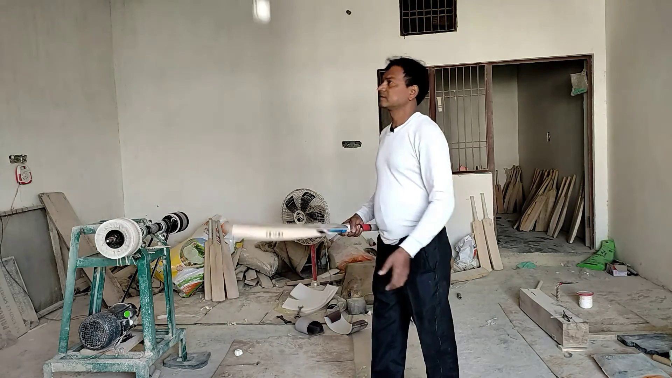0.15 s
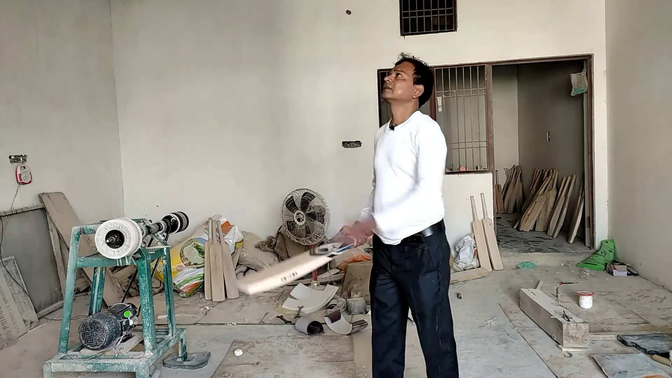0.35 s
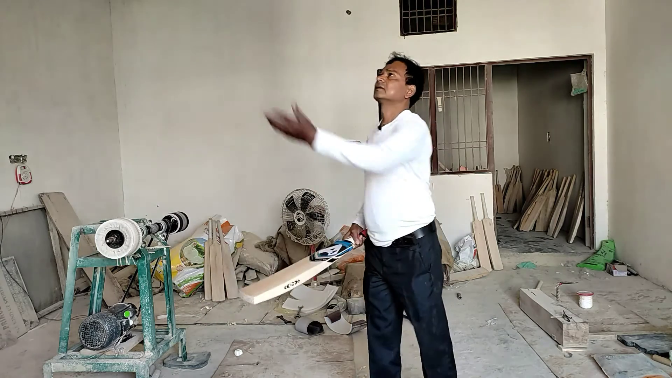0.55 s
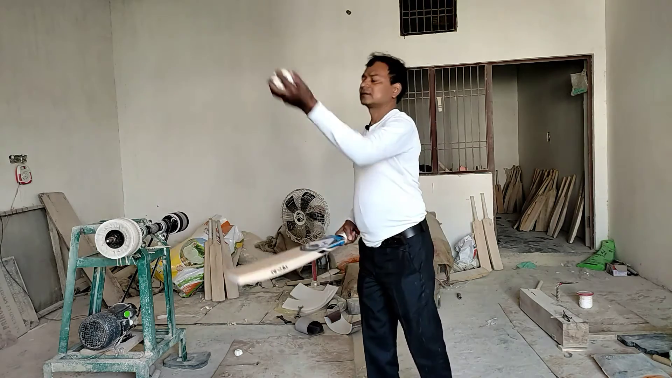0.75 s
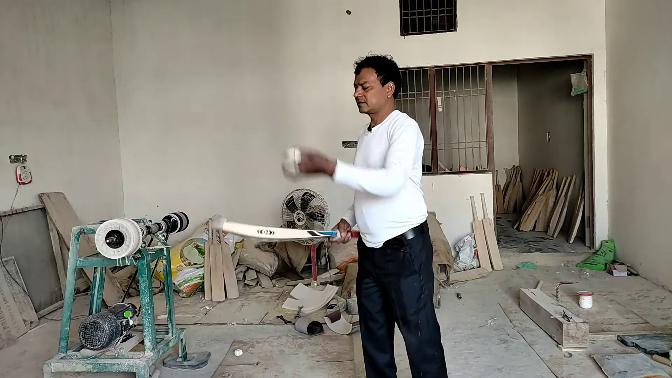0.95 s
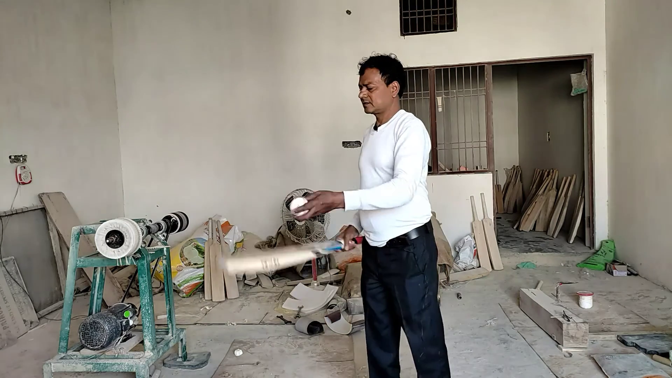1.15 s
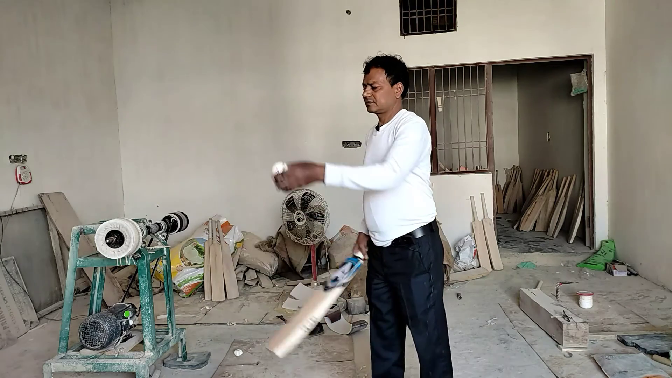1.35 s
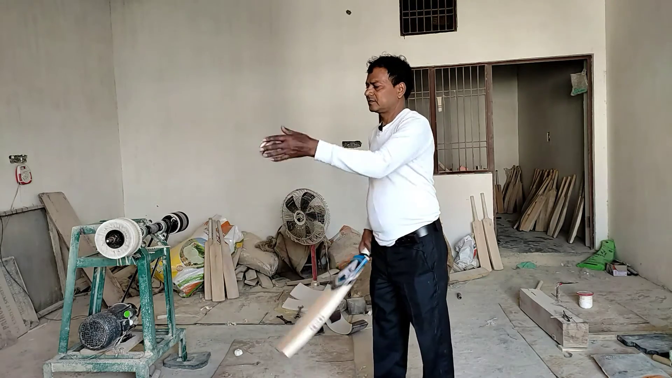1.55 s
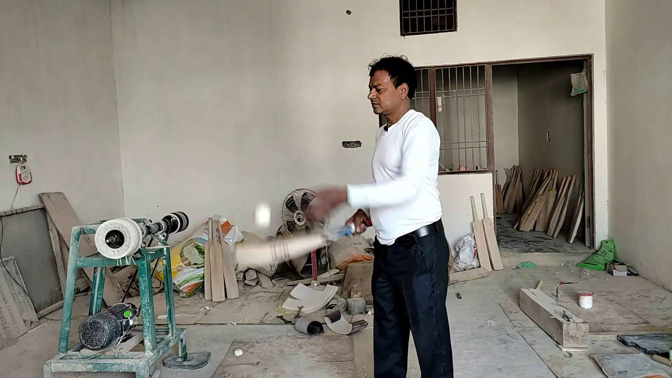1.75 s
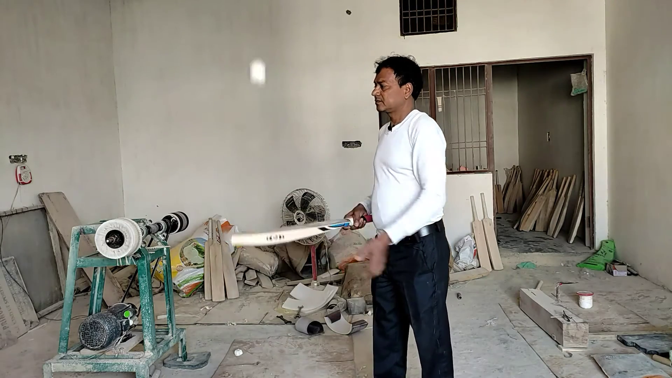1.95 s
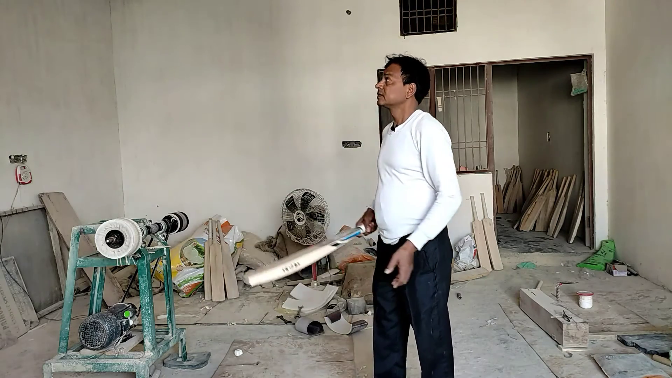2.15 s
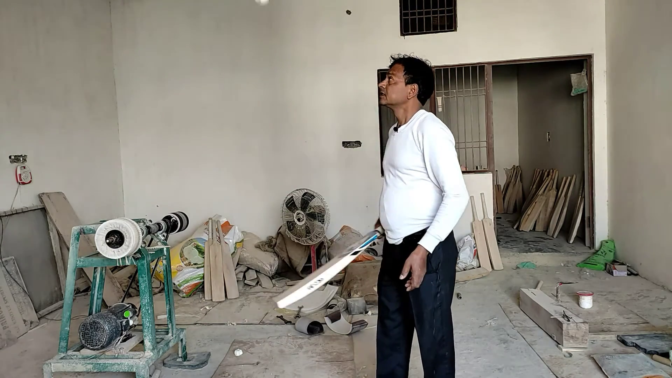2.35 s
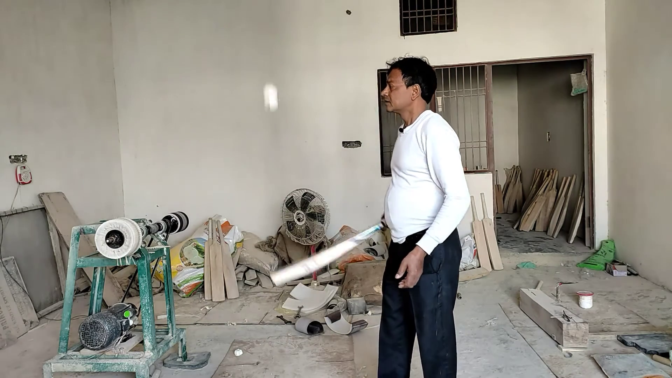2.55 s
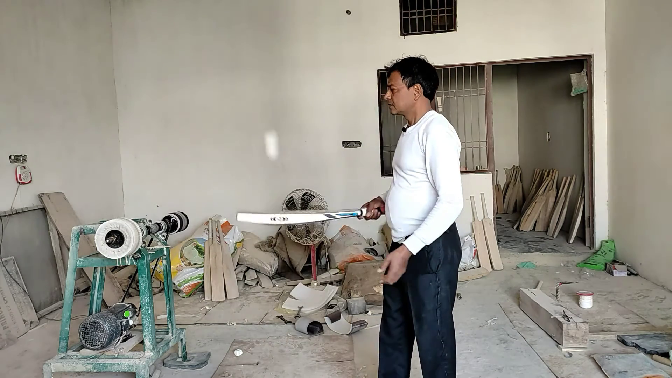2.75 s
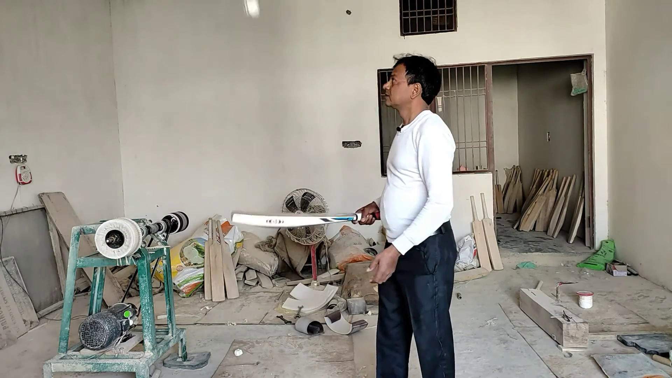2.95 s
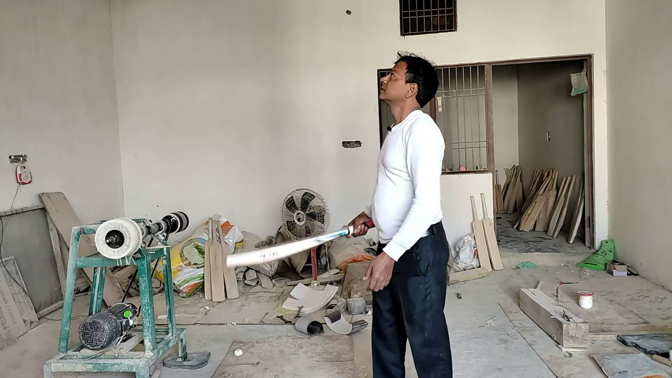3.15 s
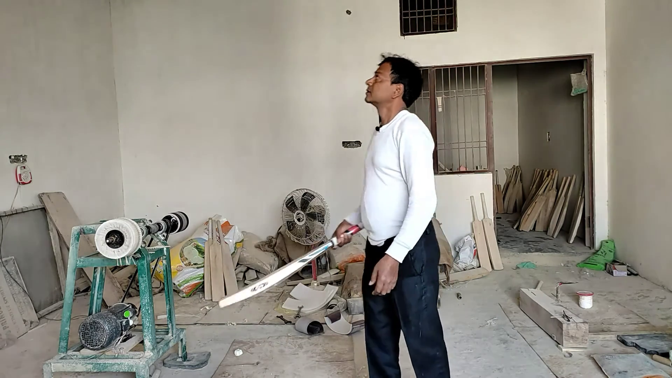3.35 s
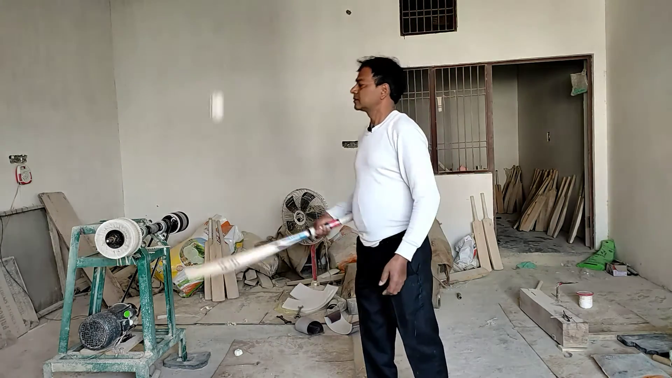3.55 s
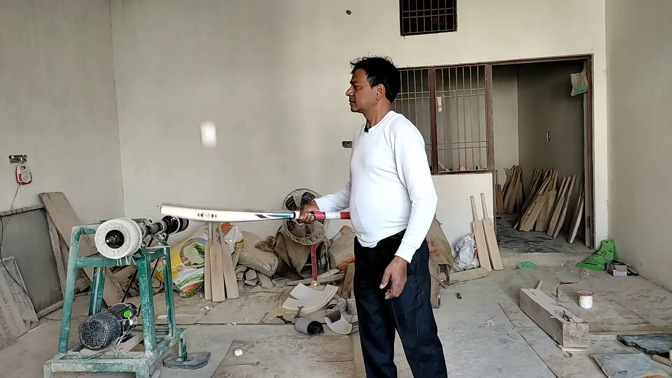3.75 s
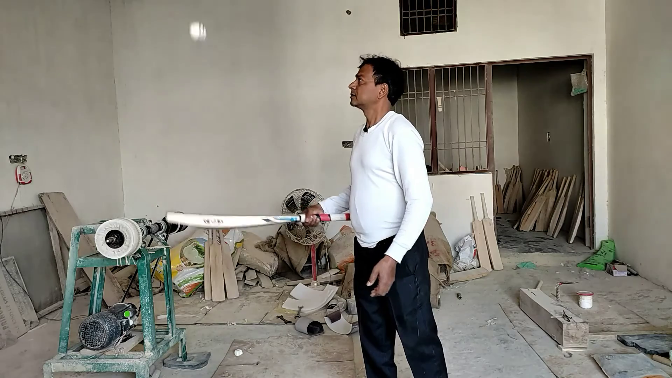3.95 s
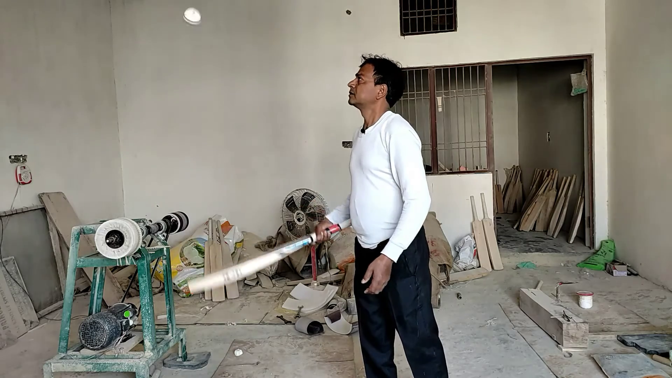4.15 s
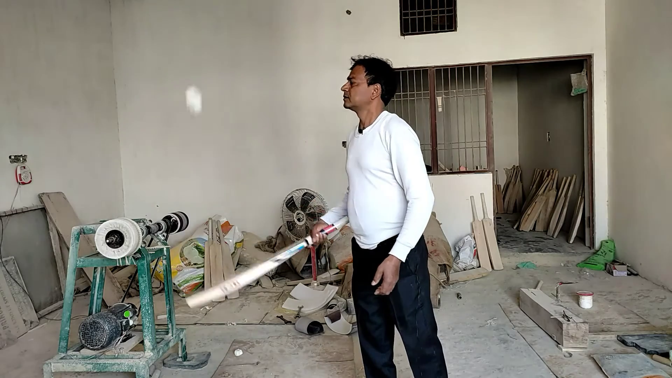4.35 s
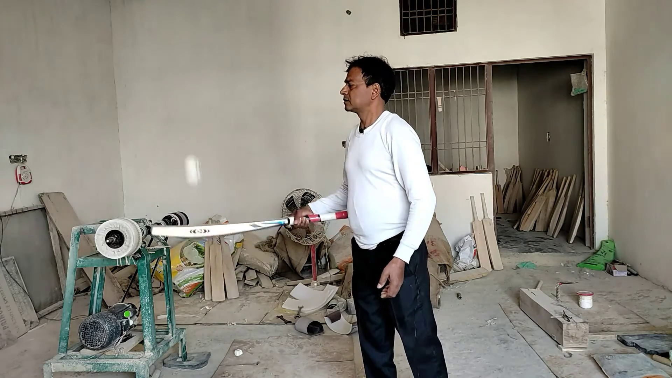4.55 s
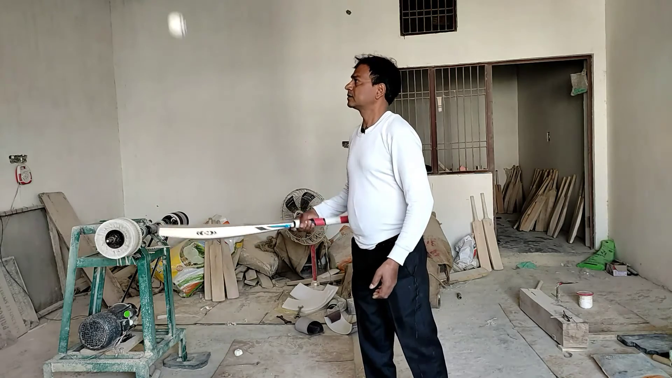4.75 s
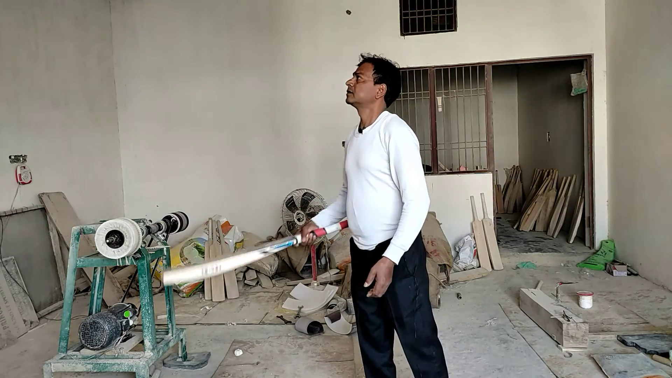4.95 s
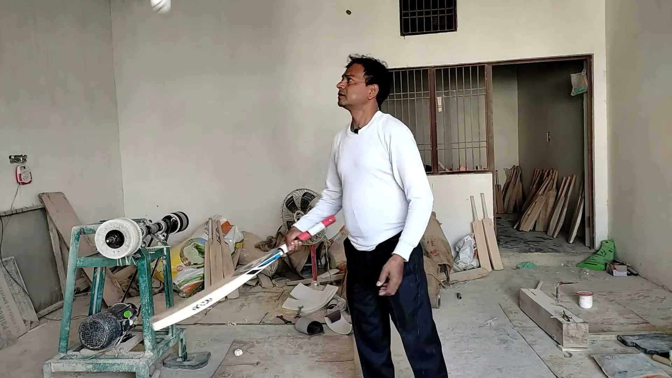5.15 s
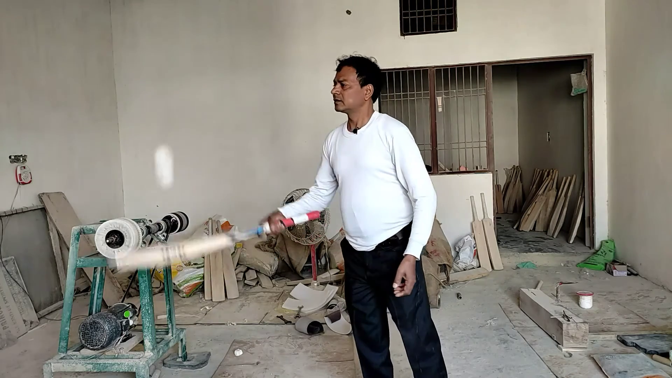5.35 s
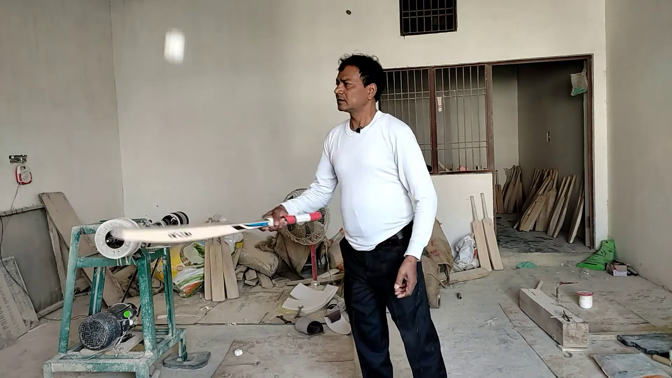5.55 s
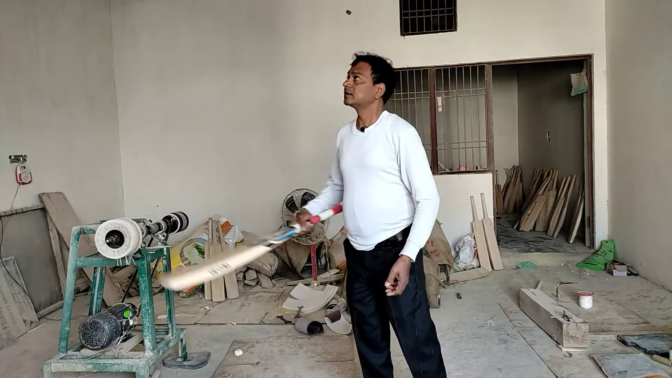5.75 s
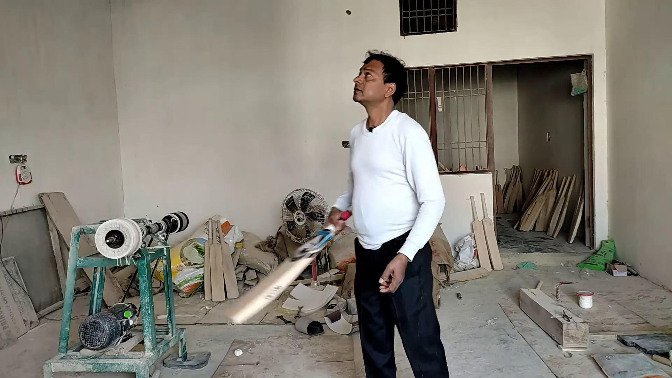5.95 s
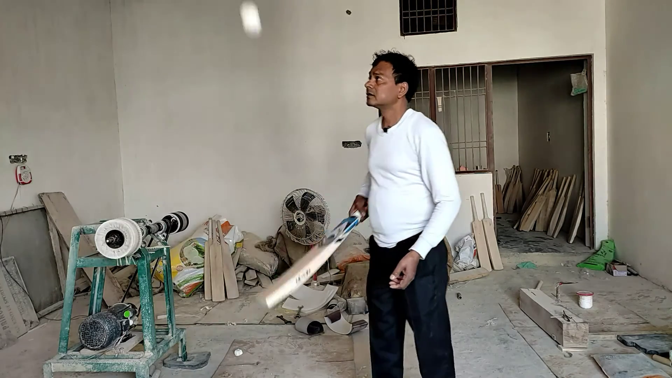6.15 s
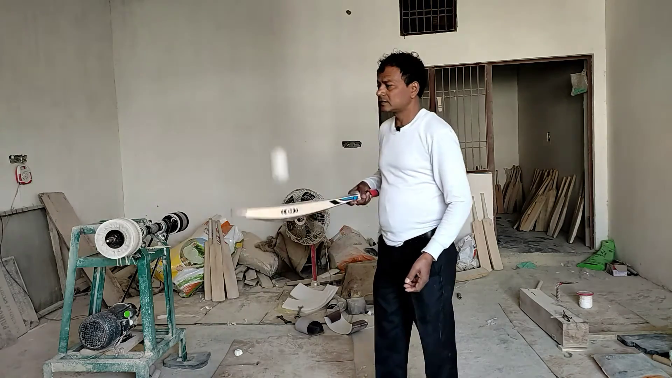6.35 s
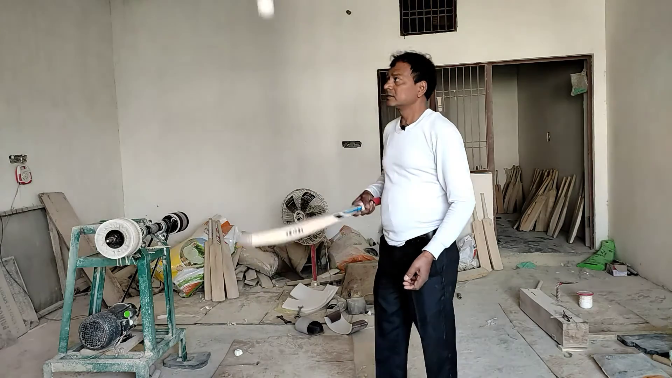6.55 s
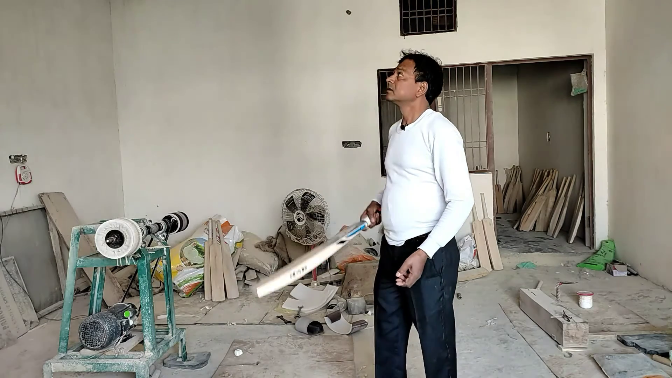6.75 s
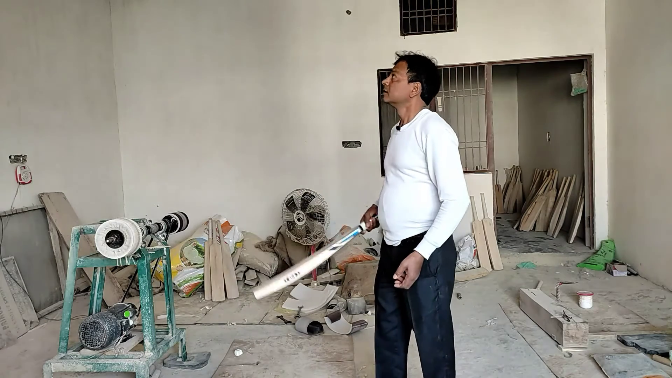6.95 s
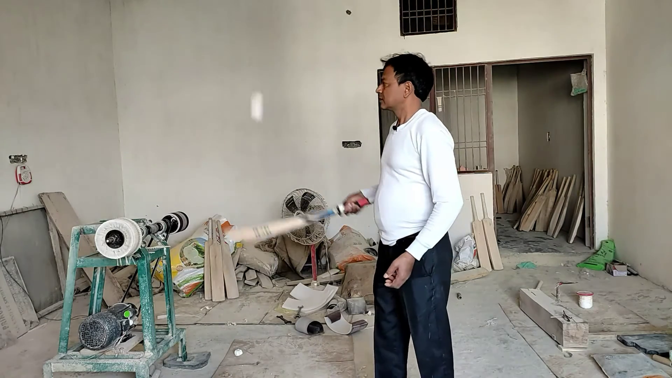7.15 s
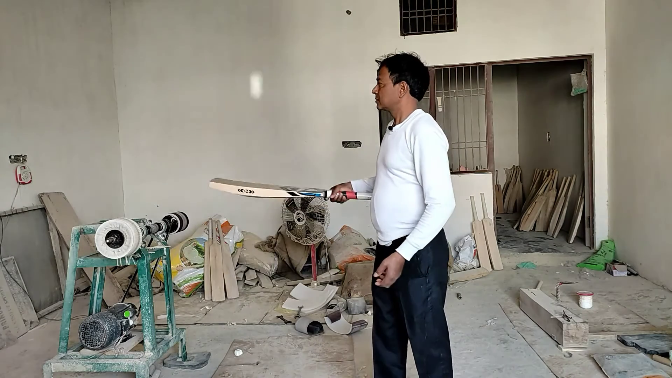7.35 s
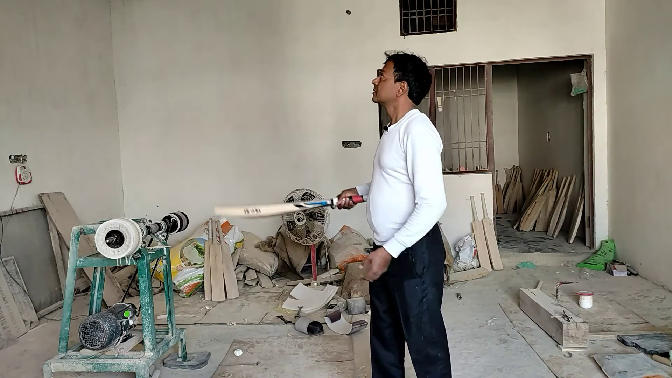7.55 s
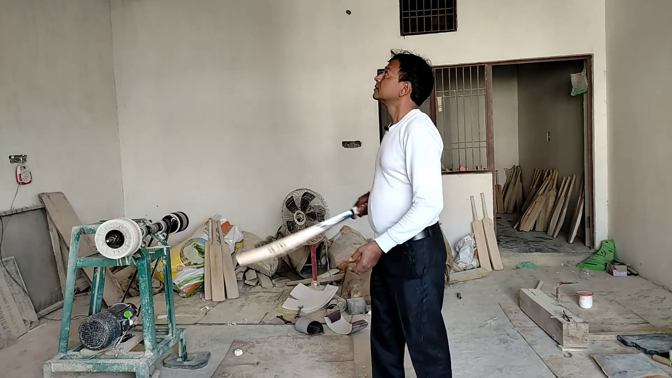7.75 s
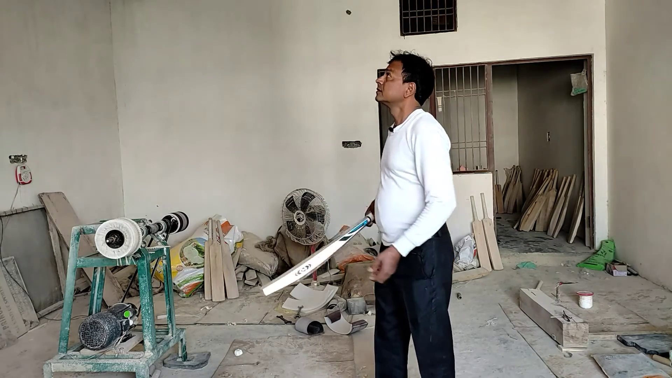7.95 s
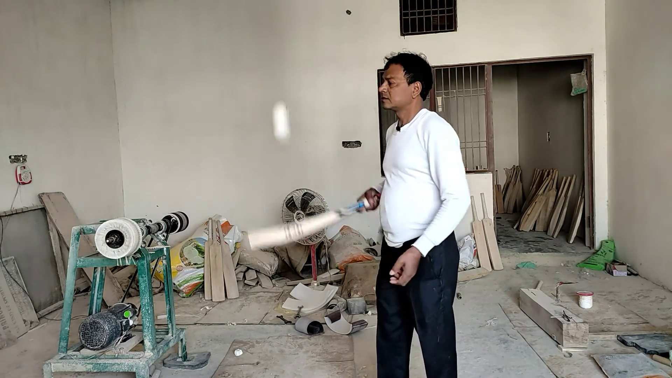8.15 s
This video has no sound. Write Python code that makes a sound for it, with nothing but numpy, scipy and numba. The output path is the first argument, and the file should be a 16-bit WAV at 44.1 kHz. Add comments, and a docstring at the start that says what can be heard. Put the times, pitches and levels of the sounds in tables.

```python
"""A bare masonry workshop, where a hard ball is tapped up eight times on the face of a wooden bat.
Each millisecond of contact rings the bat's damped modes, and the room answers for about a second.
A limiter ducks on every knock and lets go about a tenth of a second later, so the room blooms like a second beat.
Between knocks: decaying noise for handling ticks, smooth swells of noise for sleeve rustles, low noise
for air on the microphone, and a thin hiss of narrow bands over room tone and a faint drone."""
import sys
import numpy as np
from scipy import signal
from scipy.fft import rfft, irfft
from scipy.io import wavfile
from numba import njit

SR = 44100
rng = np.random.default_rng(int(sys.argv[2]) if len(sys.argv) > 2 else 0)


def int16_out(signal):
    """Quantize to a 16-bit WAV file."""
    q = np.round(np.clip(np.atleast_2d(signal).T, -1, 1) * 32767)
    wavfile.write(sys.argv[1], SR, q.astype(np.int16))


N = 365148
T = np.arange(N) / SR

# All levels in the tables are relative within their source, save where a function uses them alone.
# knocks: (time [s], level [dB], crack [dB], bending mode [dB], ping [dB], scuff [dB], room [dB],
#          limiter hold after the peak [s])
KNOCKS = [(0.0675, -1, -1.5, -0.5, -6, 1, -4, 0.089), (1.9457, -3, 0.5, -1.5, 5.5, 1, -2, 0.086),
          (2.854, 2.5, 0.5, -6.5, 3.5, 3.5, -3, 0.086), (3.8274, -0.5, -0.5, -1, 0, 6, -2, .098),
          (4.6690, -1.5, 2, -2, 5, -4, -2, 0.094), (5.5623, -2, -3, 0, -14, -3, -1, 0.0844),
          (6.4911, 3.5, -5, -1.5, -4, 7, -5, 0.081), (7.4053, 1, 2.5, 3.5, 9, 9, -4, 0.088)]
# the bat's modes, of which the first bends the blade and depends on where the ball lands:
# (frequency [Hz], decay by 60 dB [s], level [dB], sign [+1 or -1])
BAT_MODES = [(655, .041, -29, -1), (954, .0048, -3, -1), (1316, .007, 0, 1)]
# a higher mode, woken only by the hard first touch: (frequency [Hz], decay by 60 dB [s], level [dB])
PING_MODE = (2624, 0.051, -62)
# spectrum of the crack as hard surfaces meet: (frequency [Hz], level [dB])
CRACK_SPECTRUM = [(200, -33), (1200, -11.5), (2000, -13), (3200, -22), (4300, -26), (6500, -33.5),
                  (10000, -34.5), (15500, -49)]
# first echoes from floor and walls: (mean delay [s], wood level [dB], crack level [dB])
FIRST_ECHOES = [(.0047, -17.5, -14.5), (0.0112, -19.5, -40), (0.0177, -32, -18)]
# diffuse sound of the room: (frequency [Hz], level [dB], decay by 60 dB [s])
DIFFUSE_ROOM = [(49, -33, 1.8), (120, 2.5, 1.38), (218, 1, 1.09), (302, 7, 1.115), (566, -0.5, 0.98),
                (626, -1.5, 0.89), (1135, -6.5, 0.77), (1630, 0, 0.75), (1790, -5.5, 0.76), (2750, 1, 0.64),
                (4750, -0.5, 0.56), (9030, 2, 0.4), (15000, 3, 0.22)]
# standing waves between the walls: (frequency [Hz], decay by 60 dB [s], level [dB])
STANDING_WAVES = [(107, 2.35, -1.5), (122.4, 1.32, -2), (169, 0.89, -13), (216.7, 1.67, -2.5),
                  (270.8, 1.14, 7), (311, 0.33, -2), (351, 3.2, -18), (474, 1.07, 3)]
# handling ticks: (time [s], level [dB], decay by 60 dB [s], strongest frequency [Hz])
TICKS = [(0.883, -36.5, 0.013, 6200), (1.119, -48, 0.032, 9500), (2.1974, -51, 0.01, 5500),
         (3.1945, -55, 0.0115, 5500), (7.341, -41, 0.0091, 3600)]
# sleeve rustles: (time of the middle [s], level [dB], length [s], strongest frequency [Hz])
RUSTLES = [(0.537, -69, 0.099, 9000), (1.059, -53, 0.098, 1090), (1.093, -65, 0.092, 10000),
           (1.141, -54, .16, 710), (6.199, -47, 0.08, 745)]
# spectrum of air on the microphone: (frequency [Hz], level [dB])
AIR_SPECTRUM = [(4, -7.5), (13, 0.0), (25, -15.5), (50, -31), (110, -38.5), (400, -82)]
# spectrum of the quiet workshop: (frequency [Hz], level per Hz [dB])
QUIET_SPECTRUM = [(40, -5), (70, -3), (105, -11.5), (140, -12), (300, -16.5), (550, -20.5), (1200, -17.5),
                  (2000, -25.5), (3500, -28.5), (5500, -30.5), (7500, -41.5), (8400, -41.5), (12000, -42),
                  (15500, -46)]
# faint drone under the room tone: (frequency [Hz], level [dB])
DRONE = [(527.6, -70.5), (818.3, -74), (1066, -84), (1227, -72), (1491, -72.5)]
# narrow bands in the hiss: (frequency [Hz], width [Hz], mean level per Hz [dB])
HISS_BANDS = [(4546, 200, -1.5), (5540, 170, -4), (6080, 70, -1.5), (6460, 45, -1), (7170, 96, -1.5),
              (7680, 93, -4.5), (8720, 110, -11)]

CONTACT_S = 0.0011  # the ball stays on the wood equally long at every knock
RUSTLE_SKIRT_DB = -19  # for every two octaves away from a rustle's strongest frequency
# air: a steady draught that wanders by chance and swells once
AIR_DB, AIR_WANDER_DB = -47, 0.5
GUST_S, GUST_WIDTH_S, GUST_DB = 1.25, 0.51, 8
TONE_DB = -53.5
# hiss: each band wavers by chance, and the whole has one slow swell and one brief dip
HISS_DB, HISS_WAVER_DB = -64.5, 3.5
HISS_SWELL_S, HISS_SWELL_WIDTH_S, HISS_SWELL_DB = 4.2, 0.6, 3
HISS_DIP_S, HISS_DIP_WIDTH_S, HISS_DIP_DB = 5.7, 0.13, -7
TOP_HZ = 15450  # upper edge of the recorded band


def bouncing():
    """Superposition: every knock arrives directly, by the first echoes and through the room."""
    out = np.zeros(N)
    for s, db, *touch, room_db, _ in KNOCKS:
        wood, crack = undb(db + 33.0) * np.array(knock(CONTACT_S, *touch))
        add(out, s, wood + crack)
        for mean_delay, wood_db, crack_db in FIRST_ECHOES:
            # the bat is never twice in the same place, so the paths differ a little
            delay = mean_delay * (1 + 0.034 * rng.standard_normal())
            add(out, s + delay, undb(wood_db) * wood + undb(crack_db) * crack)
        reverberation = signal.fftconvolve(wood + crack, room_response())
        add(out, s, undb(room_db) * reverberation)
    return out


def knock(contact_s, crack_db, bend_db, ping_db, scuff_db):
    """Elastic contact: a push of finite length excites damped modes; the surfaces crack, ping and scuff."""
    t = T[:4096]
    # elastic force grows as the 3/2 power of the squeeze; a longer contact is duller
    squeeze = np.abs(np.sin(np.pi * np.minimum(t / contact_s, 1)))
    push = squeeze ** (3 / 2)
    ring = np.zeros(len(t))
    for (hz, t60, db, sign), spot_db in zip(BAT_MODES, [bend_db, 0, 0]):
        ring += sign * undb(db + spot_db) * fade(t, t60) * np.cos(2 * np.pi * hz * t)
    wood = signal.fftconvolve(push / push.sum(), ring)[:len(t)]

    click = signal.unit_impulse(len(t), np.argmax(push))  # at the hardest squeeze
    crack = undb(crack_db) * colour(click, CRACK_SPECTRUM) * fade(t, 0.047)
    hz, t60, db = PING_MODE
    ping = undb(db + ping_db) * fade(t, t60) * np.sin(2 * np.pi * hz * t)
    scuff = undb(scuff_db - 63) * fade(t, 0.024) * band(len(t), 8660, 3400)
    return wood, crack + ping + scuff


def room_response():
    """Reverberation: a diffuse tail whose treble dies first, over decaying standing waves."""
    t = T[:65536]
    band_hz = np.transpose(DIFFUSE_ROOM)[0]
    log_f = np.log(np.maximum(np.fft.rfftfreq(len(t), 1 / SR), 1))
    noise = rfft(rng.standard_normal(len(t)))
    tail = np.zeros(len(t))
    for (_, db, t60), corner in zip(DIFFUSE_ROOM, np.eye(len(band_hz))):
        share = np.interp(log_f, np.log(band_hz), corner)  # overlapping triangles that sum to 1
        tail += irfft(noise * share) * undb(db) * fade(t, t60)
    waves = np.zeros(len(t))
    for hz, t60, db in STANDING_WAVES:
        waves += undb(db) * fade(t, t60) * np.sin(2 * np.pi * (hz * t + rng.random()))
    build_up = np.clip((t - 0.005) / 0.011, 0, 1)
    return build_up * (undb(-36.5) * tail + undb(-63) * waves)


def handling():
    """Reverberant field: ticks and rustles at the hand are heard with a little of the room."""
    direct = ticks() + rustles()
    return direct + undb(1.5) * signal.fftconvolve(direct, room_response())[:N]


def ticks():
    """Impulsive friction: ball and grip tick in the hand as decaying noise in one broad resonance."""
    out = np.zeros(N)
    t = T[:8192]
    for s, db, t60, hz in TICKS:
        add(out, s, undb(db) * fade(t, t60) * band(len(t), hz, 4.7 * hz))
    return out


def rustles():
    """Cloth friction: noise with a broad spectral peak swells softly and subsides."""
    out = np.zeros(N)
    for s, db, length, hz in RUSTLES:
        swell = np.hanning(int(length * SR))
        skirts = [(hz * 2.0 ** (2 * k), abs(k) * RUSTLE_SKIRT_DB) for k in range(-2, 3)]
        cloth = unit(colour(rng.standard_normal(len(swell)), skirts))
        add(out, s - length / 2, undb(db) * swell * cloth)
    return out


def air():
    """Pressure fluctuation: slow air presses on the microphone as noise of very low frequency."""
    gust_db = GUST_DB * bump(GUST_S, GUST_WIDTH_S)
    level_db = AIR_DB + AIR_WANDER_DB * walk(count=24) + gust_db
    return undb(level_db) * unit(colour(rng.standard_normal(N), AIR_SPECTRUM))


def room_tone():
    """Stationary noise: the quiet of the workshop has a fixed spectrum and level."""
    return undb(TONE_DB) * unit(colour(rng.standard_normal(N), QUIET_SPECTRUM))


def drone():
    """Narrow-band noise: sharp resonances are heard as faint, unsteady tones."""
    return sum(undb(db + 0.5) * band(N, hz, width=9.4) for hz, db in DRONE)


def hiss():
    """Sum of independent bands: each wavers by itself, and the whole swells once and dips once."""
    bands = np.zeros(N)
    for hz, width, db in HISS_BANDS:
        waver_db = HISS_WAVER_DB * walk(count=24)
        bands += undb(db + waver_db) * band(N, hz, width) * np.sqrt(width)  # power grows with width
    swell_db = HISS_SWELL_DB * bump(HISS_SWELL_S, HISS_SWELL_WIDTH_S)
    dip_db = HISS_DIP_DB * bump(HISS_DIP_S, HISS_DIP_WIDTH_S)
    return undb(HISS_DB + swell_db + dip_db) * unit(bands)


def undb(db):
    """Logarithmic level: decibels to gain."""
    return 10 ** (np.asarray(db) / 20)


def unit(x):
    """Normalization: scale to rms 1."""
    return x / np.sqrt(np.mean(x ** 2))


def fade(t, t60):
    """Exponential decay: 60 dB are lost in t60 seconds."""
    return np.exp(-np.log(1000) * t / t60)


def add(out, s, x):
    """Linear superposition: mix x into out from time s on."""
    i = max(int(s * SR), 0)
    out[i:i + len(x)] += x[:N - i]


def colour(x, points):
    """Linear filtering: weight the spectrum by (frequency [Hz], level [dB]) points."""
    hz, db = np.transpose(points)
    f = np.maximum(np.fft.rfftfreq(len(x), 1 / SR), 1)
    gain = undb(np.interp(np.log(f), np.log(hz), db))
    return irfft(rfft(x) * gain, len(x))


def band(size, hz, width):
    """Resonance: noise through one damped oscillator, at rms 1."""
    f = np.maximum(np.fft.rfftfreq(size, 1 / SR), 1)
    detuning = (f * f - hz * hz) / (f * width)
    return unit(irfft(rfft(rng.standard_normal(size)) / (1 + 1j * detuning), size))


def walk(count):
    """Slow random fluctuation: count random levels joined by straight lines."""
    return np.interp(T, np.linspace(0, T[-1], count), rng.standard_normal(count))


def bump(s, width_s):
    """Gaussian envelope: a smooth rise to 1 at time s and back to 0."""
    return np.exp(-((T - s) / width_s) ** 2)


def scene():
    """Superposition: all sources add at the one microphone."""
    background = air() + room_tone() + drone() + hiss()
    return (bouncing() + handling() + background)[None]


@njit
def limiter_gain(x, hold, ceiling, attack, release):
    """Gain control: drop to fit each peak under the ceiling, wait out the hold time, then recover."""
    gain, g, goal, wait = np.empty(len(x)), 1.0, 1.0, 0.0
    for i in range(len(x)):
        need = ceiling / max(abs(x[i]), ceiling)
        wait -= 1 / SR
        if need < goal:
            goal, wait = need, hold[i]
        elif wait < 0:
            goal = need
        g += (goal - g) / (SR * (attack if goal < g else release))
        gain[i] = g
    return gain


def record(dry):
    """Nonlinear transmission: a look-ahead limiter ducks the knocks, overshoots clip round, the top is cut."""
    ahead = int(0.0085 * SR)  # samples of look-ahead
    early = np.pad(dry[0], (0, ahead))[ahead:]
    knocks = np.array(KNOCKS)
    hold = np.interp(T, knocks[:, 0], knocks[:, -1]) + ahead / SR
    attack_s, release_s = 0.001, 0.0021
    ducked = dry * limiter_gain(early, hold, 1.33, attack_s, release_s)
    clipped = ducked / (1 + ducked ** 8) ** (1 / 8)
    top_cut = signal.ellip(10, 0.1, 70, TOP_HZ, fs=SR, output="sos")
    return signal.sosfilt(top_cut, clipped)


dry = scene()
out = record(dry)
int16_out(out)
```